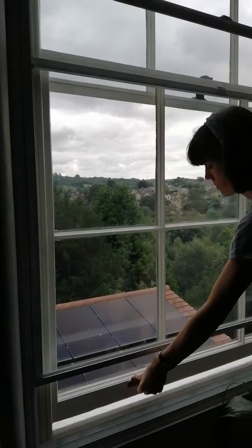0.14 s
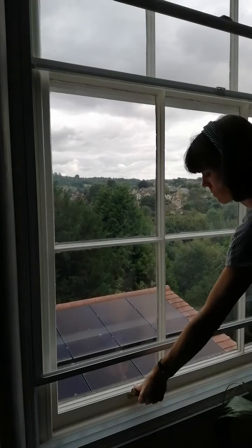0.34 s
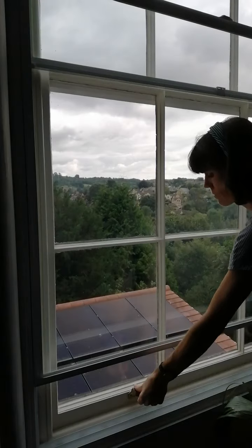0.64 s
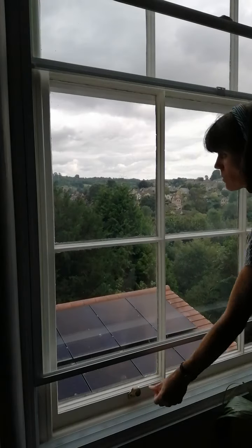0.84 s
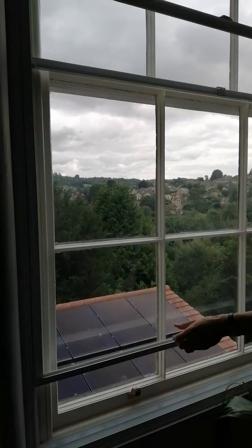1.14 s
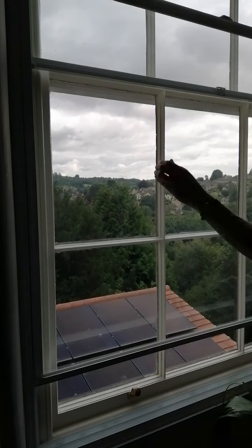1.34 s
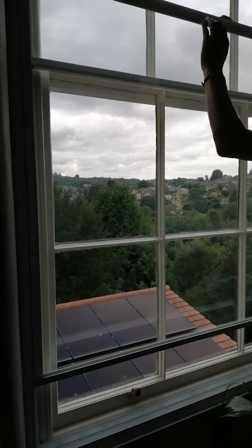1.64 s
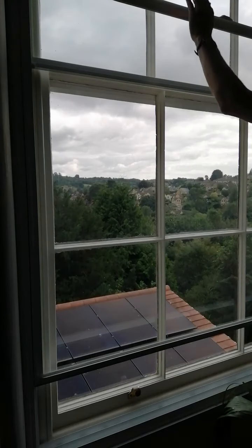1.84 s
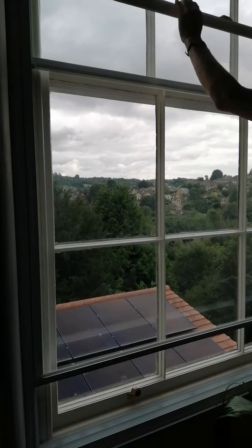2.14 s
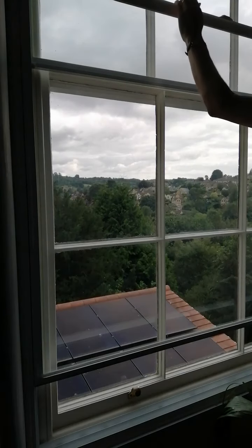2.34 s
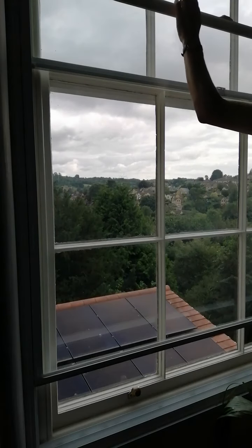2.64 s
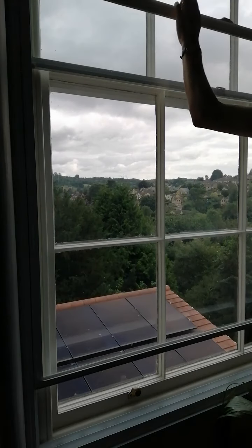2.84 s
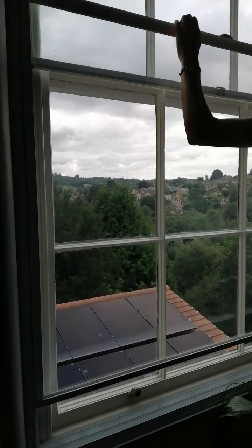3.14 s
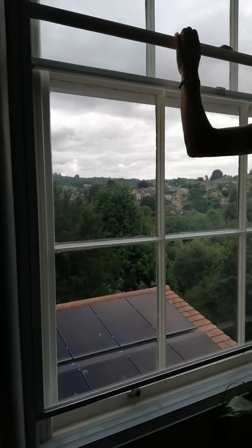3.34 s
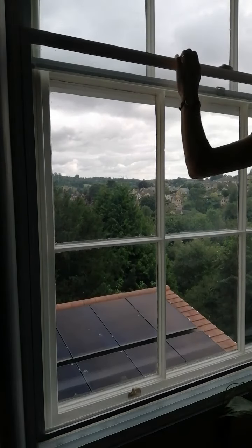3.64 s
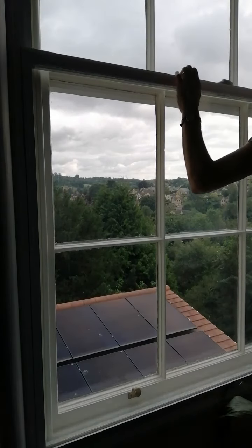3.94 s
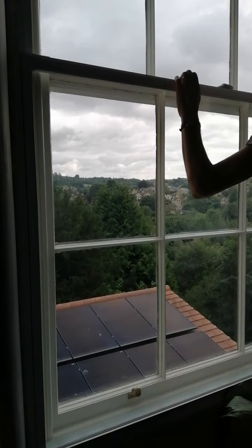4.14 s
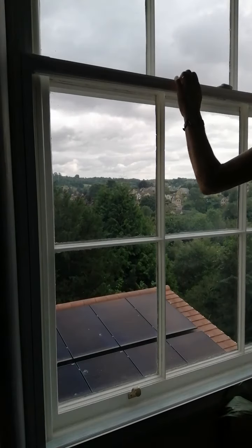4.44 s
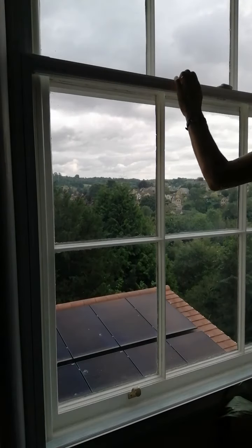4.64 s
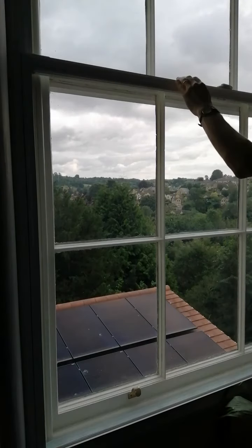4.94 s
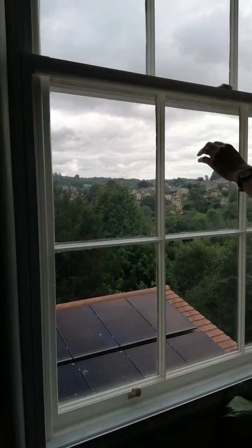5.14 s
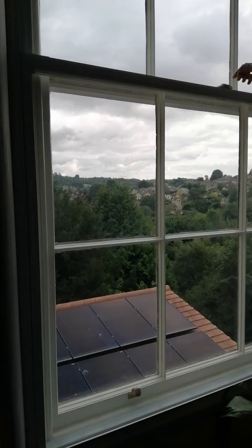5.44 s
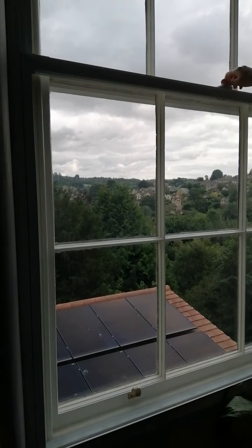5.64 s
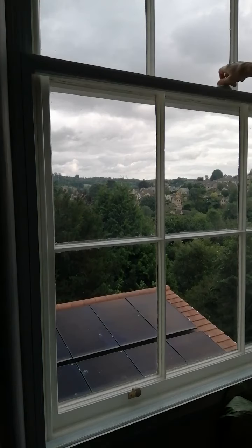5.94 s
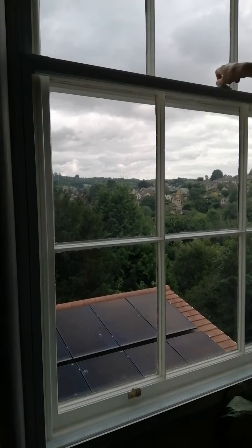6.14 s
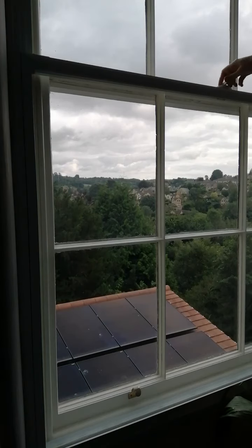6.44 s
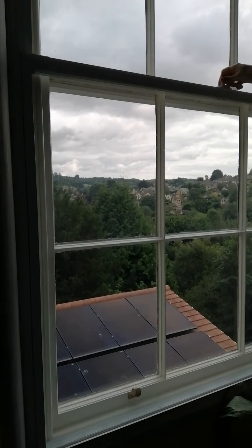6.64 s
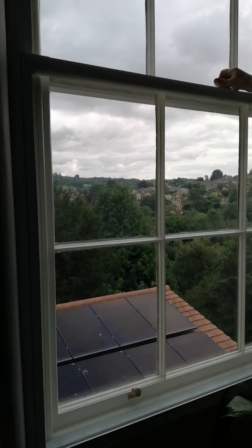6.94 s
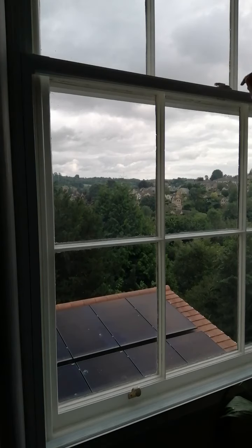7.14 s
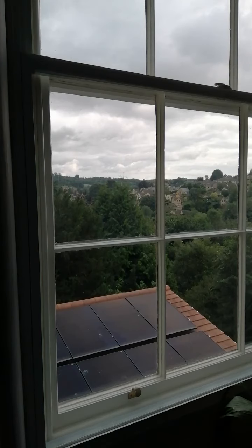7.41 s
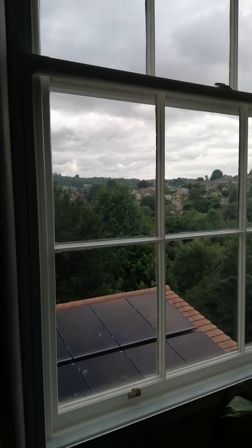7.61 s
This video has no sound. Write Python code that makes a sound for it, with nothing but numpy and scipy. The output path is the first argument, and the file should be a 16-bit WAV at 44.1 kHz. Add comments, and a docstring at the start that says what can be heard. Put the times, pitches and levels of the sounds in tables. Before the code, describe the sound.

A sash window slides down and thuds onto its sill, then the upper sash cracks loose, scrapes and knocks home with small catch clicks.

```python
"""A sash window in a small room: the lower sash slides down and thuds onto the sill.
The upper sash cracks free of its seals, slides and knocks home; the frame ticks and the catch is worked.
Slides are grain friction, thuds struck modes, cracks slip bursts through coloured bodies.
Hand and sleeve brush, seals squeal, a finger squeaks; faint outdoor air lies under all, a far drone briefly.
"""
import sys
import numpy as np
from scipy import signal
from scipy.fft import rfft
from scipy.io import wavfile

SR = 44100
rng = np.random.default_rng(int(sys.argv[2]) if len(sys.argv) > 2 else 0)


def wrap_up_sound(samples):
    """Save the sound to the file named by the first command line argument, as 16-bit audio."""
    columns = np.atleast_2d(samples).T
    # keep every value between -1 and 1, then stretch to whole-number steps
    tamed = np.clip(columns, -1, 1)
    steps = np.round(tamed * 32767).astype(np.int16)
    wavfile.write(sys.argv[1], SR, steps)


N = 342644
TIME = np.arange(N) / SR

# Sliding sashes, levels before the trims in slides(): time_s, rub_level_db, hiss_level_db
LOWER_SLIDE = [(0.0, -46.5, -53.5), (0.064, -49.5, -53.5), (0.314, -50, -48.5), (0.38, -50.5, -51),
               (0.43, -52, -51)]
UPPER_SLIDE = [(2.9, -50.5, -60), (2.934, -61, -59), (3.114, -56, -50), (3.24, -61.5, -57.5),
               (3.65, -59, -59), (3.848, -63.5, -63.5), (4.02, -58, -58.5)]
LOWER_RUMBLE_DB, UPPER_RUMBLE_DB = 4.5, -15  # re rub_level_db, before trim
# Seal friction spectra: freq_hz, gain_db
RUB = [(530, -12.5), (900, -10.5), (1210, -22.5), (1440, -14.5), (1940, -5), (2520, 0), (2790, 0),
       (3260, 3.5), (3830, -7.5), (4500, -5), (5850, -30.5), (9900, -120)]
HISS = [(2350, -69.5), (4000, -37), (4700, -10), (5230, -3.5), (6520, -1.5), (6760, -1.5), (7290, -13),
        (7540, -30), (7800, -34.5), (10100, -75.5), (17200, -120)]
RUMBLE = [(24, -37.5), (40, -10), (190, 6.5), (326, 1.5), (369, -1.5), (615, -5), (674, -14.5), (890, -7.5),
          (1210, -12), (1600, -10), (2080, -56), (3520, -120)]

# Strokes of hand and sleeve, before trim: peak_s, length_s, level_db
BRUSHES = [(1.105, 1, -68), (1.886, 0.19, -66), (2.1, 0.11, -65.5), (2.29, 0.087, -63),
           (4.837, 0.28, -62.5), (5.119, 0.081, -54), (5.427, 0.09, -57.5), (5.525, 0.23, -68),
           (6.473, 0.036, -73), (6.842, 0.17, -64.5), (6.962, 0.078, -56.5), (7.482, 0.15, -61.5),
           (7.71, 0.15, -64.5)]
# Skin and cloth spectrum: freq_hz, gain_db
SLEEVE = [(800, -26), (1900, -18.5), (3100, -3), (3900, -15.5), (5000, -6.5), (6500, 2.5), (7500, -13.5)]
BRUSH_RISE = 0.33  # share of a stroke spent swelling
RUSTLE_DB = -73  # rustle between strokes, before trim

# Outdoor air spectrum: freq_hz, gain_db
AIR = [(12, -27.5), (20, 1.5), (124, -5.5), (209, -8.5), (237, -11.5), (353, -13), (567, -15.5),
       (611, -15.5), (710, -17), (1110, -19), (1260, -22), (3020, -21.5), (4180, -28.5), (6390, -25),
       (7800, -45), (10100, -59.5), (17200, -120)]
AIR_DB = -70

# Seals squealing, pitch before waver: start_s, length_s, first_pitch_hz, last_pitch_hz, level_db
SQUEALS = [(0.043, 0.13, 2950, 3170, -61.5), (0.177, 0.16, 3320, 3330, -52.5),
           (0.291, .16, 3310, 2865, -51), (2.949, .22, 2836, 2520, -55.5), (3.348, .09, 2540, 2480, -57.5),
           (3.589, 0.051, 2750, 2710, -51.5)]

# Sash bumping its frame, levels before trim: start_s, level_db, corner_hz (hardness),
# flex_db (pane, re level_db), rocking_s
# 0.37-0.53 lower sash; 2.58-2.79 upper sash jerks; 3.9-4.15 knocks home; 5.98-6.15 catch
THUDS = [ (0.37, -28, 188, -13.5, .04), (.449, -26.5, 358, -15, .04), (.527, -36.5, 327, -7, .1),
         (.812, -53, 570, 0, .04), (1.15, -64, 252, -9, .04), (2.585, -55, 1200, -51, .04),
         (2.671, -53, 1100, -46, .04), (2.79, -47.5, 1400, -43, .04), (3.904, -58.5, 350, -22.5, .1),
         (4.039, -37.5, 260, 1.5, .04), (4.095, -33.5, 111, -5, .04), (4.152, -34.5, 545, -5, .44),
         (4.61, -49, 690, -32.5, .04), (5.396, -67.5, 300, -2, .17), (5.986, -49, 370, -16, 0.19),
         (6.146, -41, 384, -18, 0.23), (6.707, -60, 416, -15, .1), (7.28, -69, 260, 2, 0.18), ]
# Sash and glass modes, before detuning: freq_hz, level_db, t60_s
FRAME = [(65.6, -5.5, 0.35), (81.8, -2, 0.27), (104.6, -2.5, 0.35), (130.9, -2, 0.45), (180.6, -7, 0.49),
         (206, 1.5, 0.33), (235, -13, 0.19), (259.9, -3.5, 0.36), (340, 0.5, 0.24), (416, -9.5, .2),
         (454.5, -5, 0.22), (587, -15, 0.2)]
# Dense wood modes spectrum: freq_hz, gain_db
DENSE = [(25, -27.5), (60, 0.5), (120, 7.5), (160, -0.5), (220, 3.5), (480, -4.5), (1000, -4.5),
         (1600, -10), (3000, -35)]
ROCK_S = 0.063  # mean time between rebounds
ROCK_FADE_DB = -19.5  # over the whole rocking
ROCK_SOFTEN = 0.84  # corner_hz factor per rebound

# Plastic cracks and clacks, levels before trims: start_s, ring_db (rail), snap_db (edges),
# body_db (hollow), chatter_s
# 0.442 lower sash meets sill; 2.325 upper sash takes the strain; 2.583 cracks free in three jerks;
# 4.04 knocks home; 4.597 frame ticks as the hand lets go; 5.986 catch is worked
CLACKS = [ (.442, -59, -34.5, -36, 0.0052), (0.811, -74, -64, -57, 0.017), (0.842, -84, -54, -83, 0.0024),
          (1.834, -63.5, -64.5, -65.5, 0.013), (2.325, -40.5, -48.5, -60, 0.027),
          (2.363, -35, -43, -47.5, 0.0066), (2.583, -30.5, -38.5, -39, 0.022),
          (2.666, -32, -37, -38, 0.018), (2.689, -36, -35, -41.5, 0.012),
          (2.756, -24.5, -25.5, -36.5, 0.04), (3.411, -63, -48, -63.5, .01), (4.04, -37.5, -51, -52, .02),
          (4.0554, -34.5, -50, -28, 0.0035), (4.064, -32, -44, -50, 0.011), (4.08, -41, -34.5, -58, 0.0079),
          (4.119, -38, -57, -51, 0.0044), (4.147, -33.5, -52, -38.5, 0.0098),
          (4.162, -32.5, -36.5, -41, .011), (4.203, -38, -47, -41, 0.0064),
          (4.433, -55.5, -63.5, -78, 0.0033), (4.597, -33, -51.5, -38.5, 0.0075),
          (4.911, -40.5, -47.5, -49.5, .007), (4.9146, -34, -28.5, -53, 0.002),
          (5.407, -67, -51, -82, 0.011), (5.986, -65.5, -69.5, -69, 0.0074),
          (6.108, -45.5, -56.5, -55, .009), (6.143, -38, -37, -38, 0.015), (6.297, -52, -58.5, -73, .004),
          (6.714, -58.5, -73, -70, .04), ]
# Rail, edge and hollow spectra: freq_hz, gain_db
RING = [(800, -36.5), (1400, -14.5), (2000, -8), (2500, -3.5), (3000, 3.5), (3400, -0.5), (3900, -11.5),
        (5000, -12), (8000, -33)]
SNAP = [(80, -26.5), (450, -9), (2500, -11.5), (3800, -11), (4500, -2.5), (5400, 4), (6400, 7.5), (7100, 5),
        (8000, -42.5), (9000, -36)]
BODY = [(50, -46), (130, -26.5), (260, -3.5), (450, 4), (570, 0.5), (660, 2), (800, -1.5), (980, 2),
        (1300, -7), (1800, -9), (2500, -9), (4000, -37.5)]

# Far drone, fundamental before waver: time_s, fundamental_hz, level_db (before partial levels)
DRONE = [(.55, 177.5, -89), (0.701, 176.6, -66.5), (0.951, 174.1, -65), (1.15, 172.8, -64),
         (1.33, 169.7, -66.5), (1.45, 172, -96)]

# Finger squeaking on the rail, pitch before the 0.99 ratio and waver: time_s, pitch_hz, level_db
SQUEAK = [(4.73, 2586, -85), (4.78, 2530, -71), (4.81, 2590, -74), (4.835, 2630, -63), (4.88, 2680, -87)]

# Room reflections: freq_hz, t60_s, strength_db (relative)
ROOM = [(100, 0.62, -3), (268, 0.31, 1.5), (730, 0.36, 6.5), (1650, 0.38, 3), (3070, 0.46, -2),
        (4380, 0.37, 0.5), (6780, 0.31, 1)]
EDGE_HZ = 7650


def gain_of(db):
    """Decibels to amplitude."""
    return 10 ** (np.asarray(db) / 20)


def evened(x):
    """Scales to rms 1."""
    return x / np.sqrt(np.mean(x ** 2) + 1e-20)


def unit(x):
    """Scales to energy 1."""
    return x / (np.linalg.norm(x) + 1e-12)


def read(points, hz):
    """Reads a spectrum on a log-frequency axis."""
    point_hz, value = np.transpose(points)
    return np.interp(np.log(hz + 1), np.log(point_hz + 1), value)


def add(mix, start_s, sound):
    """Mixes a sound in at start_s."""
    part = mix[max(round(start_s * SR), 0):][:len(sound)]
    part += sound[:len(part)]


def causal(spectrum, size=4096):
    """Minimum-phase impulse response, energy 1, of a body with this spectrum."""
    hz = abs(np.fft.fftfreq(size, 1 / SR))
    log_gain = np.log(gain_of(np.maximum(read(spectrum, hz), -100)))
    response = np.fft.ifft(np.exp(np.conj(signal.hilbert(log_gain)))).real
    return unit(response[:size // 2])


def coloured(x, spectrum):
    """Passes x through a body with this spectrum."""
    return signal.oaconvolve(x, causal(spectrum))[:len(x)]


def wander(top_hz):
    """Slow random curve of rms 1, up to about top_hz."""
    points = rng.standard_normal(16384)
    return evened(np.interp(2 * top_hz * TIME, np.arange(len(points)), points))


def glide(rows, partials, waver, top_hz=40):
    """Wavering tone along rows (s, Hz, dB) with partials (multiple, dB); fast waver makes it hoarse."""
    time_s, pitch_hz, level_db = np.transpose(rows)
    wavering_hz = np.interp(TIME, time_s, pitch_hz) * (1 + waver * wander(top_hz))
    turns = np.cumsum(wavering_hz) / SR
    tone = sum(gain_of(db) * np.sin(2 * np.pi * k * turns) for k, db in partials)
    sounding = (TIME > time_s[0]) * (TIME < time_s[-1])
    return tone * gain_of(np.interp(TIME, time_s, level_db)) * sounding


def reflections(build_s):
    """Scattered echoes that build up, then die band by band; each call draws its own pattern."""
    t = TIME[:SR // 2]
    echoes_per_s = 8000
    taps = rng.standard_normal(len(t)) * (rng.random(len(t)) < echoes_per_s / SR)
    hz, frame_s, bands = signal.stft(taps, SR, nperseg=256)
    room = np.array(ROOM)
    t60_s = read(room[:, [0, 1]], hz)[:, None]
    strength_db = read(room[:, [0, 2]], hz)[:, None]
    decaying = bands * gain_of(strength_db - 60 * frame_s / t60_s)
    tail = signal.istft(decaying, SR, nperseg=256)[1][:len(t)]
    return unit(tail * (1 - np.exp(-t / build_s)))


def room(x, wet_db):
    """Direct sound plus its reflections, scaled to hold the combined power."""
    wet = gain_of(wet_db)
    echoes = signal.fftconvolve(x, reflections(build_s=0.011))[:N]
    return (x + wet * echoes) / np.hypot(1, wet)


def grains(per_s, spread_db):
    """Tiny slips of uneven size at random instants."""
    size = rng.standard_normal(N) * gain_of(spread_db * np.minimum(rng.exponential(1, N), 4))
    return size * (rng.random(N) < per_s / SR)


def slides(rub_db=-1.5, hiss_db=0, rumble_db=-5.5, judder_db=1.27, patchy_db=(1.6, 1, 2.5), fade_s=0.051):
    """Seal bristles flick along the track; uneven pressure judders, colour shifts with the surface."""
    out = np.zeros(N)
    frictions = []
    for colour, patch_db in zip((RUB, HISS, RUMBLE), patchy_db):
        friction = evened(coloured(grains(per_s=4400, spread_db=-0.5), colour))
        frictions.append(friction * gain_of(patch_db * wander(top_hz=20)))
    for rows, sash_rumble_db in ((LOWER_SLIDE, LOWER_RUMBLE_DB), (UPPER_SLIDE, UPPER_RUMBLE_DB)):
        time_s, rub_rows, hiss_rows = np.transpose(rows)
        rub = np.interp(TIME, time_s, rub_rows)
        hiss = np.interp(TIME, time_s, hiss_rows)
        # fades lie just outside the first and last row
        moving = np.clip(np.minimum(TIME - time_s[0], time_s[-1] - TIME) / fade_s + 1, 0, 1)
        levels_db = (rub + rub_db, hiss + hiss_db, rub + sash_rumble_db + rumble_db)
        for friction, level_db in zip(frictions, levels_db):
            out += moving * gain_of(level_db) * friction
    return out * gain_of(judder_db * wander(top_hz=46.4))


def brushing(trim_db=-2, uneven_db=1):
    """Fine friction of skin and cloth: each stroke swells quickly and dies away more slowly."""
    power = gain_of(RUSTLE_DB) ** 2
    for peak_s, length_s, level_db in BRUSHES:
        width_s = length_s * np.where(TIME < peak_s, BRUSH_RISE, 1 - BRUSH_RISE)
        power = power + gain_of(level_db) ** 2 * np.exp(-2 * ((TIME - peak_s) / width_s) ** 2)
    friction = evened(coloured(rng.standard_normal(N), SLEEVE))
    return np.sqrt(power) * gain_of(trim_db + uneven_db * wander(top_hz=15)) * friction


def outdoor_air():
    """Steady air: coloured noise at a constant level."""
    return gain_of(AIR_DB) * evened(coloured(rng.standard_normal(N), AIR))


def squeals(ends_db=-14, waver=0.04):
    """A seal grabs: a hoarse tone swells and fades while its pitch slides."""
    out = np.zeros(N)
    u = np.linspace(0, 1, 9)
    for start_s, length_s, first_hz, last_hz, level_db in SQUEALS:
        pitch_hz = first_hz + (last_hz - first_hz) * u
        swell_db = level_db + ends_db * (2 * u - 1) ** 2
        rows = np.c_[start_s + length_s * u, pitch_hz, swell_db]
        out += glide(rows, [(1, 0.015)], waver, top_hz=406)
    return out


def blows(uneven_s=0.0049, rebound_flex_db=-7):
    """Each bump and its ever weaker, softer rebounds as the sash rocks to rest: s, dB, corner Hz, flex dB."""
    chances = rng.standard_normal(size=(len(THUDS), 12))
    for (start_s, level_db, corner_hz, flex_db, rocking_s), chance in zip(THUDS, chances):
        yield start_s, level_db, corner_hz, flex_db
        for k, late in enumerate(chance, 1):
            after_s = k * ROCK_S
            if after_s < rocking_s:
                yield (start_s + after_s + uneven_s * late,
                       level_db + ROCK_FADE_DB * after_s / rocking_s,
                       corner_hz * ROCK_SOFTEN ** k,
                       flex_db + rebound_flex_db)


def thuds(trim_db=-13, modes_db=-3.0, dense_t60_s=0.2, pane_hz=34, pane_t60_s=0.45, bass_share=0.18):
    """A blow rings the sash's main modes and many dense ones, and the pane flexes slowly."""
    out = np.zeros(N)
    t = TIME[:SR * 2 // 3]
    for start_s, level_db, corner_hz, flex_db in blows():
        # each blow shifts every mode's pitch slightly at random
        detune = 1 + 0.017 * rng.standard_normal(len(FRAME))
        modes = np.zeros(len(t))
        for (hz, db, t60_s), ratio in zip(FRAME, detune):
            modes += gain_of(db - 60 * t / t60_s) * np.sin(2 * np.pi * hz * ratio * t)
        # short, woody wash
        dense = coloured(rng.standard_normal(len(t)) * gain_of(-60 * t / dense_t60_s), DENSE)
        pane = unit(np.sin(2 * np.pi * pane_hz * detune[0] * t) * gain_of(-60 * t / pane_t60_s))
        # soft blows are deep, hard ones thin
        contact = signal.butter(2, [corner_hz * bass_share, corner_hz], "band", fs=SR, output="sos")
        blow = signal.sosfilt(contact, gain_of(modes_db) * unit(modes) + unit(dense))
        thud = unit(blow) + gain_of(flex_db) * pane
        add(out, start_s, -np.sqrt(SR) * gain_of(level_db + trim_db) * thud)
    return out


def clacks(trims_db=(-23, -23, -25.5), spikiness=1.38, first_slip=0.19, wet_db=-5.5,
           build_s=0.0038, creep_s=0.00092, cutoff=1.25):
    """Brief creep, one sharp slip and a dying chatter ring the rail, its edges and its hollow."""
    out = np.zeros(N)
    lead = SR // 100  # samples of creep before the slip
    t = TIME[:SR // 8] - TIME[lead]
    parts = np.array([causal(RING), causal(SNAP), causal(BODY)])
    hz = np.fft.rfftfreq(parts.shape[1], 1 / SR)
    part_powers = abs(rfft(parts)) ** 2
    for start_s, ring_db, snap_db, body_db, chatter_s in CLACKS:
        gains = gain_of(np.array([ring_db, snap_db, body_db]) + trims_db)
        creep = np.minimum(t, 0) / creep_s
        chatter = (np.maximum(t, 0) / chatter_s) ** cutoff
        force = np.exp(creep - chatter)
        for part, gain in zip(parts, gains):
            chance = rng.standard_normal(len(t))
            slips = unit(np.sign(chance) * abs(chance) ** spikiness * force)
            slips[lead] += first_slip
            add(out, start_s + t[0], gain * unit(signal.fftconvolve(slips, part)))
        # in the room the parts add as powers; a long chatter fills it more slowly
        power = gains ** 2 @ part_powers
        spectrum = np.c_[hz, 10 * np.log10(power / power.max() + 1e-12)]
        echoes = coloured(reflections(build_s + chatter_s / 2), spectrum)
        add(out, start_s, gain_of(wet_db) * np.linalg.norm(gains) * echoes)
    return np.sqrt(SR) * out


def far_drone(partials_db=(-5, -13, -11)):
    """Partials 2, 3 and 4 of a wavering tone that sinks in pitch, then lifts slightly as it fades."""
    return glide(DRONE, enumerate(partials_db, 2), waver=0.0086)


def finger_squeak():
    """A finger squeaks on the rail: one slightly wavering tone."""
    return glide(SQUEAK, [(0.99, 0)], waver=0.011)


def scene():
    """The window heard from inside the room."""
    rubbing = slides() + brushing() + squeals() + finger_squeak()
    outdoors = outdoor_air() + far_drone()
    mix = room(rubbing, wet_db=-7.0) + outdoors + room(thuds(), wet_db=-5.5) + clacks()
    return mix[None]


def record(dry):
    """Narrow-band recorder: a steep low-pass at EDGE_HZ."""
    low_pass = signal.firwin(255, EDGE_HZ, window=("kaiser", 8), fs=SR)
    return signal.oaconvolve(dry, low_pass[None], "same")


dry = scene()
out = record(dry)
wrap_up_sound(out)
```